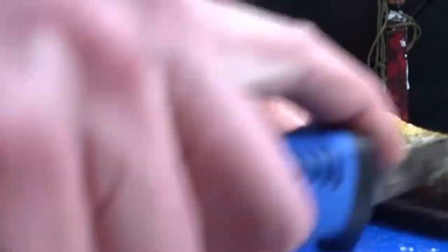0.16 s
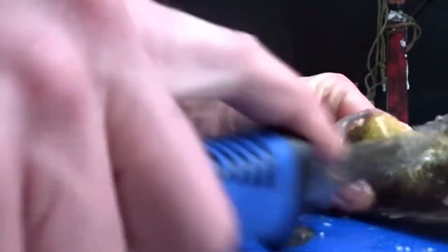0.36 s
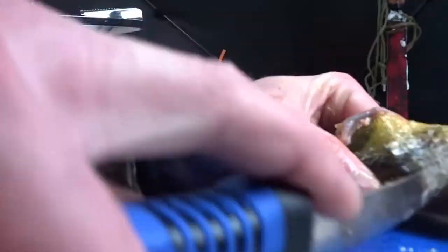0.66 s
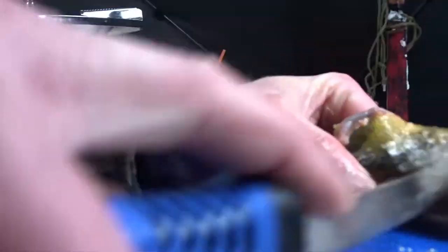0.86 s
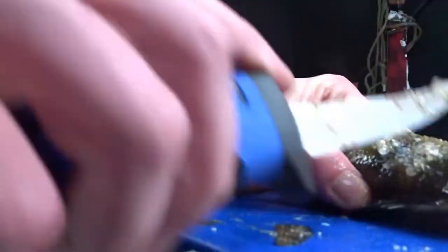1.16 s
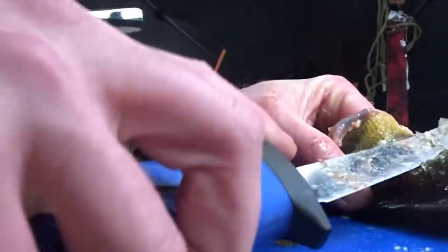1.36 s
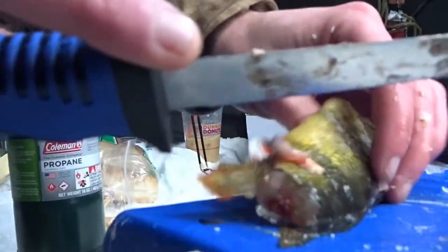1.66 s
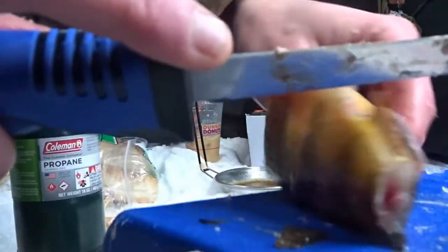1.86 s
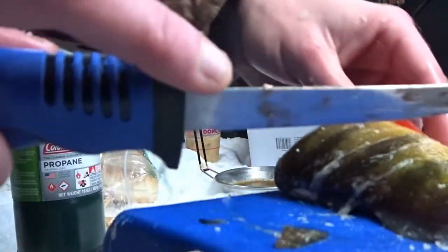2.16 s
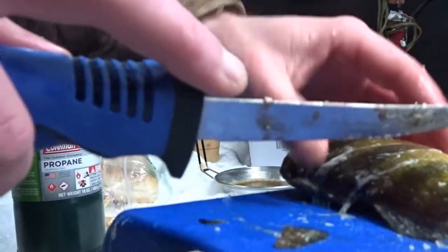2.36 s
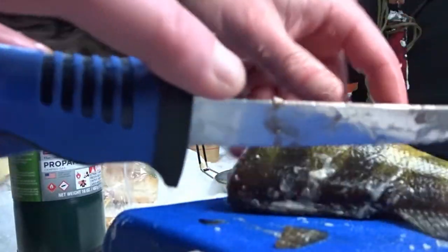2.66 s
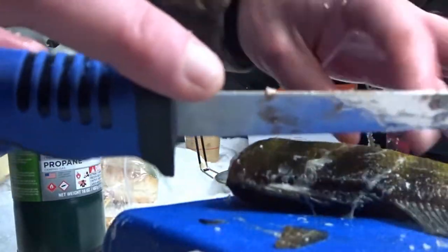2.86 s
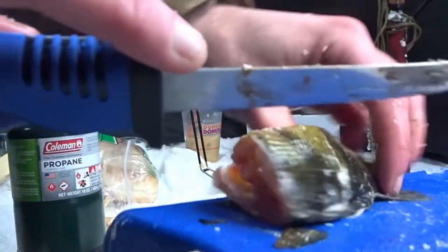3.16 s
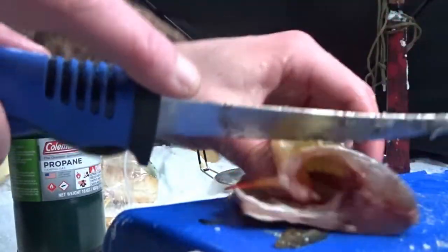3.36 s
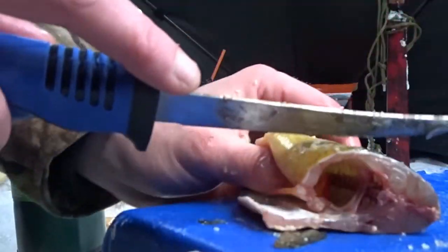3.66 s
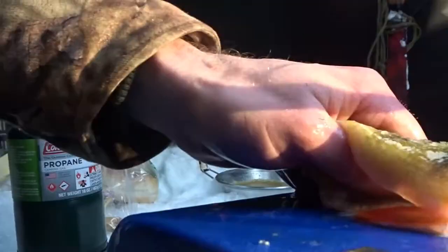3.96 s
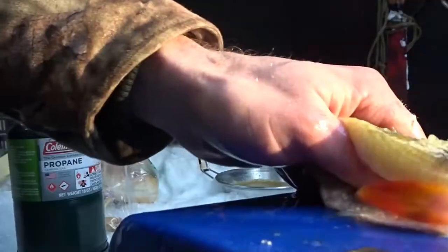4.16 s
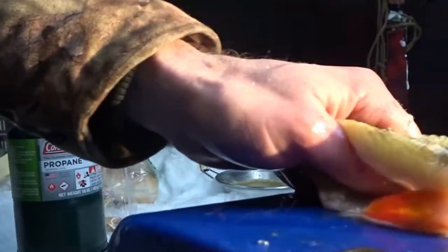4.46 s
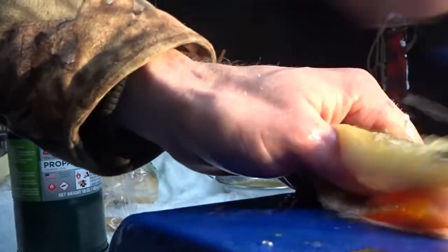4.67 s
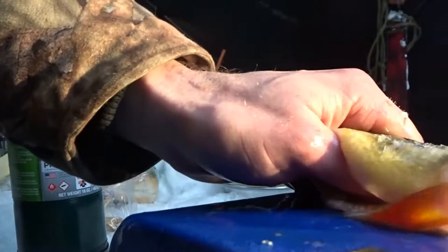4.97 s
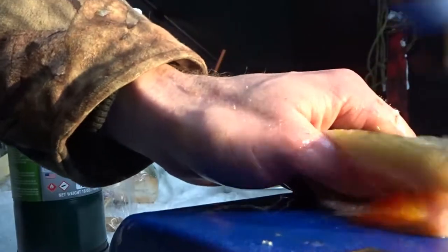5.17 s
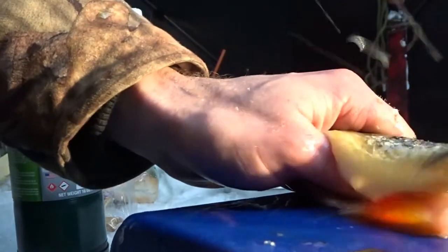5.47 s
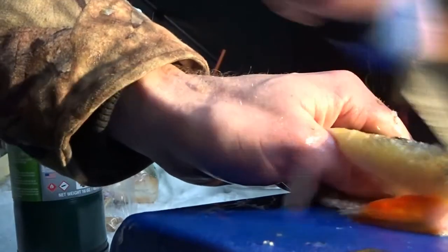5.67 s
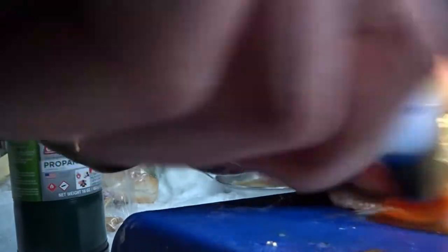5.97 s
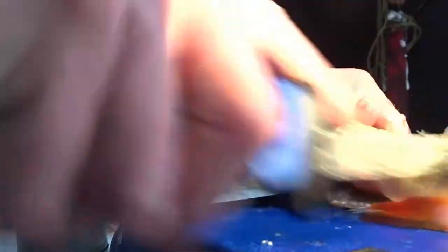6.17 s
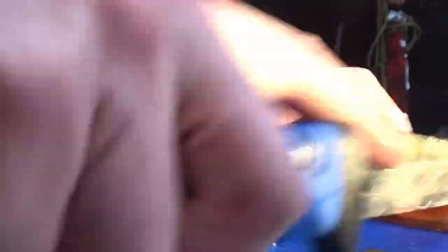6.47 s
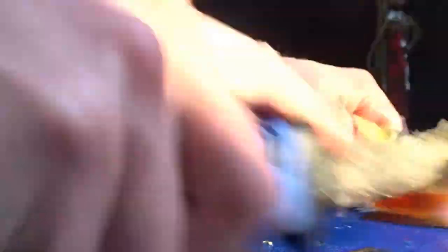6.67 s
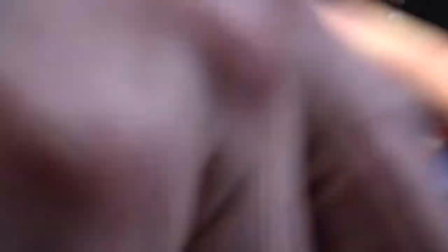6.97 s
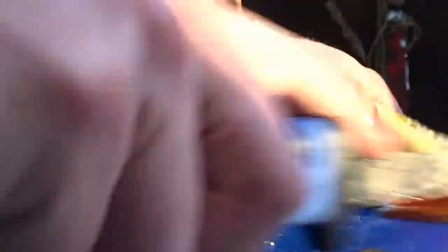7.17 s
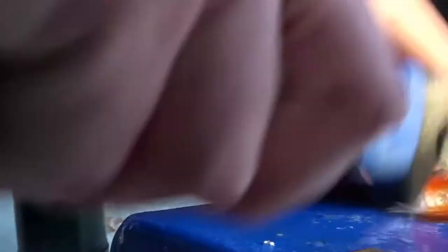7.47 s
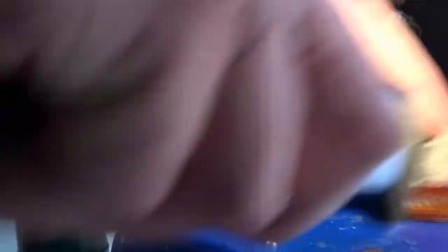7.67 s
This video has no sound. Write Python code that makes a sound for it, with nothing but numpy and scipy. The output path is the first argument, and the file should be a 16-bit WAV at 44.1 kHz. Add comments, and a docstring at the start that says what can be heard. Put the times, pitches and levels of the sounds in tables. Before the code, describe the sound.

Quick dry rasps of a knife blade scraping scales off a fish, a pause of soft wet handling, then steady crackling strokes ending in a metal clink.

```python
"""A knife blade rasps scales off a fish on a plastic board, close by in a canvas shelter: flicked scales are
random damped sines, swelled by each stroke, over skin hiss (shaped noise) and board and table (noise in resonances).
Quick strokes; a pause while the wet fish is turned, slid about and squeaks (two wavering tones); then steady strokes
until the blade clinks on metal (decaying modes over noise). A far engine hums (sines) under quiet air (noise)."""
import sys
import numpy as np
from scipy import signal
from scipy.fft import rfft, irfft, next_fast_len
from scipy.io import wavfile
from scipy.ndimage import map_coordinates

SR = 44100
rng = np.random.default_rng(int(sys.argv[2]) if len(sys.argv) > 2 else 0)


def output_pcm(signal):
    """Save a mono or channel-first signal as 16-bit PCM at the path in sys.argv[1].

    Samples are clipped to [-1, 1] before scaling.
    """
    pcm = np.clip(np.atleast_2d(signal).T, -1, 1) * 32767
    wavfile.write(sys.argv[1], SR, np.round(pcm).astype(np.int16))


N = 344990


def amp(db):
    """Amplitude factor of a level in dB."""
    return 10 ** (np.asarray(db) / 20)


def unit(x):
    """x scaled to rms 1."""
    return x / np.sqrt(np.mean(x ** 2) + 1e-20)


def along(points, hz):
    """(Hz, value) points interpolated on a log frequency axis."""
    f, v = np.transpose(points)
    return np.interp(np.log(hz + 1), np.log(f + 1), v)


def curves(rows):
    """One value per sample for each column after the time."""
    s, *cols = np.transpose(sorted(rows))
    return [np.interp(np.arange(N) / SR, s, c) for c in cols]


def wobble(rate_hz):
    """Smooth random curve with rate_hz knots a second."""
    knots = rng.standard_normal(int(N * rate_hz / SR) + 4)
    return map_coordinates(knots, [np.arange(N) * rate_hz / SR])


def filtered(x, response):
    """x times a complex response of frequency."""
    m = next_fast_len(N + SR // 2)
    return irfft(rfft(x, m) * response(np.fft.rfftfreq(m, 1 / SR)), m)[..., :N]


def noise(spectrum):
    """Two unrelated noises of joint rms 1, shaped by (Hz, dB per Hz) points."""
    return unit(filtered(rng.standard_normal((2, N)), lambda hz: amp(along(spectrum, hz))))


# Air spectrum. Each row: frequency in Hz, relative density in dB per Hz.
AIR_SPECTRUM = [(15, -49), (25, -36), (108, -11), (161, -13.5), (363, -10.5), (451, -4.5), (1260, -2),
                (1610, 0), (3520, 4), (5730, 4), (6740, -3.5), (12900, -10), (16000, -26.5)]
# Engine firing orders. Each row: frequency in Hz, rms level in dB before the swell.
ENGINE_ORDERS = [(161.5, -77.5), (215.3, -80), (269.2, -92)]
# Engine swell. Each row: time in seconds, gain in dB at 150 Hz.
ENGINE_SWELL_CURVE = [(0, -3), (.85, 4), (.95, 2.5), (1.41, 3.5), (1.45, -4), (2.6, 0.5), (2.9, -8),
                      (3.6, -7), (4, -14), (7.82, -19)]


def air():
    """Soft room air, and low orders of a far engine, slightly unsteady; higher orders swell and fade more."""
    t = np.arange(N) / SR
    swell_db, = curves(ENGINE_SWELL_CURVE)
    hum = np.zeros(N)
    for hz, db in ENGINE_ORDERS:
        level_db = db + swell_db * (hz / 150) ** 2 + 1.2 * wobble(2.8)
        turns = hz * t + 0.023 * wobble(6.3)
        hum += np.sqrt(2) * amp(level_db) * np.sin(2 * np.pi * turns)
    hiss = amp(-57.5 + 0.44 * wobble(6.1)) * noise(AIR_SPECTRUM)
    return hiss + hum * [[1], [0]]  # hum in the common signal only


# Board resonances. Each row: frequency in Hz, width in Hz, gain in dB.
BOARD_MODES = [(337, 34.4, -4), (475.3, 55.4, 3), (604, 235, -2.5), (876, 127, 1), (1020, 65, 2.5),
               (1337, 150, 0), (1686, 125, -3), (2160, 270, -4), (3840, 660, -8)]


def board(x):
    """Plastic board resonances in parallel; too small a plate to radiate deep bass."""
    def response(f):
        total = 0
        for k, (hz, width_hz, db) in enumerate(BOARD_MODES):
            mode = 1j * f * width_hz / (hz * hz - f * f + 1j * f * width_hz)
            total = total + (-1) ** k * amp(db) * mode  # alternating sign
        return 1j * f / (220 + 1j * f) * total
    return filtered(x, response)


def plucks(start, hz, cycles, size):
    """Damped sines with soft onset, in two unrelated phases; things this small radiate no bass."""
    t = np.arange(400) / SR
    turns = hz[:, None] * t
    decay = np.exp(-turns / cycles[:, None])
    shape = size[:, None] * decay * (1 - np.exp(-turns / 0.088))
    phase = rng.random((len(hz), 2)).T[..., None]
    waves = shape * np.sin(2 * np.pi * (turns + phase))
    where = (start[:, None] + np.arange(len(t))).ravel()
    both = np.array([np.bincount(where, w.ravel(), N + len(t))[:N] for w in waves])
    return filtered(both, lambda f: (1j * f / (600 + 1j * f)) ** 2)


def rasp(ring_hz, cycles, rate_hz, spread, spiky_db):
    """Scales flick past the edge: most ring near the given pitch, the rest tick more briefly and scatter wider."""
    draw = rng.random((int(rate_hz * N / SR), 3))
    start = (draw[:, 0] * N).astype(int)
    rings = draw[:, 1] < .68
    life = np.where(rings, cycles[start], 1.6)  # 1/e decay in cycles
    # damped scales agree less in pitch
    hz = ring_hz[start] * np.exp(spread / life * rng.standard_normal(len(draw)))
    size = amp(-spiky_db * np.log(1.03 - draw[:, 2])) / np.sqrt(life)  # many small, a few large
    return unit(plucks(start, hz, life, size))


def catches(rate_hz, release_s):
    """Stick and slip: contact catches at random and at every single tick, then lets go; zero mean, rms 1."""
    kicks = (rng.random(N) < rate_hz / SR) * rng.exponential(size=N)
    tick_s = np.transpose(SINGLE_TICKS)[0]
    kicks[np.round(tick_s * SR).astype(int)] = 1
    release = np.exp(-np.arange(SR // 10) / SR / release_s)
    shake = np.log(0.17 + signal.fftconvolve(kicks, release)[:N])
    return unit(shake - shake.mean())


SAG_DB_PER_S = 48.5  # pressure eases while held


def press(start_s, rise_s, held_s, under_db, fall_db_per_s, db, curve):
    """Power of one contact a millisecond: it lands, swells, holds, fades; and the seconds since it let go."""
    t = np.arange(0, N / SR, 1 / 1000) - start_s
    late_s = np.maximum(t - rise_s - held_s, 0)
    swell_db = -under_db * np.clip(1 - t / rise_s, 0, 1) ** curve
    sag_db = -SAG_DB_PER_S * np.clip(t - rise_s, 0, held_s)
    shape_db = swell_db + sag_db - fall_db_per_s * late_s
    return (t >= 0) * amp(2 * (db + shape_db)), late_s


# Blade strokes. Each row: landing time in seconds, dig-in in seconds, hold in seconds, landing level in dB under full,
# rasp level in dB, scale ring in Hz, then bite, hiss and board in dB over the rasp.
BLADE_STROKES = [(.052, 0.11, 0.0093, 7.6, -25.5, 2844, -17, -5.5, -13),
                 (0.278, .05, 0.054, 13, -25.5, 2930, -10, -3.5, -9),
                 (0.551, 0.0072, 0.034, 8.3, -30.5, 2780, -1, -5.5, -11),
                 (0.664, 0.0057, 0.0097, 6, -28.5, 2320, -5, -4, -18),
                 (.788, 0.034, 0.03, 11.3, -25.5, 2460, -6, -2.5, -10.5),
                 (4.008, 0.041, 0.036, 2.3, -26.5, 2050, -0.5, -2, -9),
                 (4.282, 0.041, 0.069, 16, -25.5, 2090, 3.5, -1, -11),
                 (4.583, 0.027, 0.047, 13, -23.5, 2050, -1.5, -3, -12),
                 (4.866, 0.022, 0.043, 14, -28, 1880, 3.5, -1.5, -5.5),
                 (5.125, 0.026, 0.022, 12.3, -23.5, 2070, 0, -7, -12),
                 (5.359, 0.034, 0.046, 21, -23, 1980, 1, -8, -13),
                 (5.642, 0.027, 0.023, 19.4, -22.5, 2220, 4, -5, -9),
                 (5.892, 0.028, 0.066, 16.5, -23, 2315, -0.5, -6.5, -11.5),
                 (6.15, 0.018, 0.042, 11, -24, 2120, 0.5, -5, -21),
                 (6.39, 0.013, .008, 6.2, -35.5, 2330, -1, -4, -40),
                 (6.436, 0.0033, 0.049, 2.7, -32, 1990, 7, 0, -19),
                 (6.624, 0.036, 0.057, 15, -23, 2290, -4, -6, -25),
                 (6.879, 0.026, 0.033, 16, -23.5, 2235, 1.5, -10, -4.5),
                 (7.11, 0.028, 0.059, 10.8, -22.5, 2203, 0.5, -6, -25),
                 (7.367, 0.033, .04, 16.5, -23, 2304, 1.5, -6, -10.5),
                 (7.576, 0.042, 0.055, 23, -24, 2310, 0.5, -7, -15.5),
                 (7.759, 0.0054, 0.014, 2.6, -33, 2180, 8.5, -6, -25)]
LIFT_DB_PER_S, HISS_LINGERS_S, RING_CLIMBS_HZ_PER_S = 426, .012, 4700
DIG_CURVE = 0.44  # under 1: edge skims first, digs in suddenly
# Blade brushing the fish on its way back. Each row: start in seconds, rasp level in dB, scale ring in Hz,
# hiss and board in dB over the rasp.
RETURN_BRUSHES = [(0.199, -39, 2580, -17, -2), (.515, -53, 2730, 7, -21), (.625, -45.5, 2500, -18, 8),
                  (.71, -46, 2300, -15, 4), (.935, -59, 1980, -21, -9), (0.746, -47, 2900, -2, -8),
                  (3.975, -42.5, 2180, -4, -13), (4.144, -38.5, 2560, -6, -6.5),
                  (4.191, -41.5, 2620, -11, -14), (4.475, -46.5, 2480, -17, -15),
                  (4.543, -42, 2260, -4, -7), (4.737, -42.5, 2340, -8, -10), (4.805, -51, 3500, -2, -8),
                  (4.829, -41, 2200, -7.5, -7), (5.234, -50, 2600, -25, 2), (5.262, -52.5, 2360, 5.5, -22),
                  (5.333, -48.5, 2220, 2, 2.5), (5.51, -51, 2800, -1, -2.5), (5.59, -39.5, 1990, -12, -36),
                  (5.823, -47, 2300, -1, -21), (6.064, -37.5, 2500, -12.5, -26),
                  (6.337, -42.5, 2270, -12, -21), (6.846, -57, 2190, 1, -17), (7.04, -62.5, 2300, -3, 8),
                  (7.334, -48, 2200, -13, -17)]
BRUSH_HELD_S, BRUSH_FADES_DB_PER_S, BRUSH_BITE_DB = 0.011, 439, 0
# Fish shoved by hand, and one thump as it slips on the board (last row). Each row: start in seconds,
# swell in seconds, hold in seconds, fade in dB/s, rasp level in dB, scale ring in Hz,
# hiss and board in dB over the rasp.
SHOVES_AND_SLIP = [(1.32, 0.018, .005, 497, -55, 2370, 2, -23),
                   (1.419, .006, 0.085, 149, -44.5, 2800, -9, -3.5),
                   (1.565, 0.013, 0.075, 111, -46.5, 2540, -6.5, -8),
                   (1.7, 0.022, 0.024, 200, -63.5, 2900, -8, 9),
                   (1.78, 0.011, .01, 199, -64.5, 2750, -9, 16),
                   (1.913, 0.029, 0.076, 494, -42, 2650, -33, 9.5),
                   (2.089, 0.026, 0.0044, 900, -39.5, 1780, -54, 6),
                   (2.17, 0.016, 0.016, 150, -64, 2300, -14, -8),
                   (2.262, .004, .006, 500, -63, 2200, -20, 10),
                   (2.29, 0.0071, 0.079, 300, -56, 2200, -29, 14),
                   (2.361, 0.0062, 0.031, 405, -44, 2320, -40, 11),
                   (2.422, 0.058, 0.026, 484, -31, 2400, -27, 9.5),
                   (2.898, .006, 0.028, 88, -39, 2970, -7.5, -11),
                   (3.084, 0.024, 0.087, 200, -44, 2620, -12, 4.5),
                   (3.168, .028, 0.0046, 304, -34.5, 2400, -20, -2.5),
                   (3.26, .03, 0.039, 200, -53, 2470, -6.5, -1),
                   (3.372, .006, 0.0076, 300, -55.5, 2250, -18, 3.5),
                   (3.462, .012, .006, 300, -45.5, 2200, -13.5, -1.5),
                   (3.53, 0.015, 0.26, 200, -53, 2030, -37, -8),
                   (3.78, 0.057, 0.0034, 500, -43, 1910, -13, -10),
                   (6.929, 0.0057, 0.015, 506, -29, 1500, -22, 9.5)]
SWELL_FROM_DB, SHOVE_BITE_DB = 15.5, 2
# Faint continuous rustle under the strokes and the handling. Each row: time in seconds, rasp level in dB,
# scale ring in Hz, board in dB over the rasp.
FAINT_RUSTLE = [(0, -85, 2200, -6), (.045, -80, 2200, -6), (.06, -64, 2580, -9), (.5, -51.5, 2460, -2.5),
                (.9, -47, 1800, -2), (1.17, -56.5, 1720, -7), (1.4, -65, 1900, -2), (1.8, -68, 2700, 4),
                (2.6, -70, 2500, 8), (2.88, -97, 2200, -12), (2.95, -54.5, 2600, 1.5),
                (3.5, -63.5, 2210, 2), (3.9, -53.5, 2050, -11), (4.5, -54.5, 2280, -7), (6, -53, 2300, -9),
                (7.82, -62, 2300, -3)]
RUSTLE_BITE_DB, RUSTLE_HISS_DB = -2, -13
LONG_CYCLES, DAMPED_CYCLES = 5.06, 2.4  # rings long under the blade and in the faint rustle, damped in shoves and slip
BOARD_JOINS_DB, BITE_QUITS_DB_PER_S = 1.5, 45  # board loads only as the edge digs in; bite goes first


def contact():
    """Contact powers add: rasp dB; bite, hiss, board in dB over it; ring Hz and cycles; one value per sample."""
    rows = [(s, rise, held, under, LIFT_DB_PER_S, db, hz, bite, hiss, low, LONG_CYCLES, HISS_LINGERS_S, DIG_CURVE)
            for s, rise, held, under, db, hz, bite, hiss, low in BLADE_STROKES]
    rows += [(s, .003, BRUSH_HELD_S, 6, BRUSH_FADES_DB_PER_S, db, hz, BRUSH_BITE_DB, hiss, low, LONG_CYCLES, 0, 1)
             for s, db, hz, hiss, low in RETURN_BRUSHES]
    rows += [(s, rise, held, SWELL_FROM_DB, fall, db, hz, SHOVE_BITE_DB, hiss, low, DAMPED_CYCLES, 0, 1)
             for s, rise, held, fall, db, hz, hiss, low in SHOVES_AND_SLIP]
    grid_s = np.arange(0, N / SR, 1 / 1000)
    knots, *columns = np.transpose(FAINT_RUSTLE)
    db, hz, low = (np.interp(grid_s, knots, c) for c in columns)
    rustle = amp(2 * db)
    total = np.array([rustle, rustle * amp(2 * RUSTLE_BITE_DB), rustle * amp(2 * RUSTLE_HISS_DB),
                      rustle * amp(2 * low), rustle * hz, rustle * LONG_CYCLES])
    for s, rise, held, under, fall, db, hz, bite, hiss, low, cycles, linger, curve in rows:
        power, late_s = press(s, rise, held, under, fall, db, curve)
        slide, _ = press(s, rise + linger, held, under, fall, db + hiss, curve)
        load, _ = press(s, rise + linger, held, under + BOARD_JOINS_DB, fall, db + low, curve)
        bite_power = power * amp(2 * (bite - BITE_QUITS_DB_PER_S * late_s))
        pitch_hz = hz + RING_CLIMBS_HZ_PER_S * np.minimum(late_s, .15)  # climbs once the contact lets go
        total += [power, bite_power, slide, load, power * pitch_hz, power * cycles]
    shares = total[1:] / total[0]
    controls = [10 * np.log10(total[0]), *10 * np.log10(shares[:3]), *shares[3:]]
    return [np.interp(np.arange(N) / SR, grid_s, c) for c in controls]


# Bite decay. Each row: time in seconds, 1/e life in cycles.
BITE_CYCLES = [(0, 2.5), (3.85, 1.47), (4.25, 11), (5.75, 7), (6.3, 1.66), (7.82, 4.4)]
# Wet skin under the edge. Each row: frequency in Hz, relative density in dB per Hz.
SKIN_HISS = [(1760, -36.5), (3000, -4), (3680, -10.5), (4050, -29), (4410, -7), (6390, -5.5),
             (15100, -17.5), (16000, -18)]
# Table shaken by the stroke. Each row: frequency in Hz, relative density in dB per Hz.
TABLE_THUD = [(15, -62), (25, -9), (60, -9.5), (120, 3), (190, 14.5), (260, 12), (380, -1), (700, -58)]


def knife():
    """Pressure drives rasp, 4 kHz bite, skin hiss, board and table; one stick-slip judder moves all but the table."""
    rasp_db, bite_db, hiss_db, board_db, ring_hz, ring_cycles = contact()
    bite_cycles, = curves(BITE_CYCLES)
    judder = catches(60, release_s=0.0072) * ring_cycles / LONG_CYCLES  # damped contacts judder less
    scales = amp(-5.0 + 3.62 * judder) * rasp(ring_hz, ring_cycles, 1300, spread=0.45, spiky_db=1.5)
    bite_rasp = rasp(np.full(N, 4050), bite_cycles, 1400, spread=0.36, spiky_db=2.0)
    bite = amp(bite_db - 6.0 + 4.54 * judder) * bite_rasp
    hiss = amp(hiss_db + 2.5 + 1.94 * judder + 3.46 * wobble(260)) * noise(SKIN_HISS)
    load = amp(rasp_db + board_db + 0.33 * judder + 3.33 * wobble(150))
    plastic = board(load * rng.standard_normal((2, N)))
    plastic /= np.sqrt(np.mean(board(rng.standard_normal(N)) ** 2))  # unit board gain for white noise
    table = amp(0.49 * board_db - 31 + 3 * wobble(21)) * noise(TABLE_THUD)
    return amp(rasp_db) * (scales + bite + hiss + table) + amp(-5.5) * plastic


# Single ticks: scales snapping under the blade, and knocks as the fish is handled. Each row: time in seconds,
# relative level in dB, ring in Hz, treble crack in dB over that level before the common crack gain.
SINGLE_TICKS = [(0.0536, -35, 2170, -6), (0.0873, -12.5, 3070, -13), (0.122, -21, 5600, -3),
                (0.1302, -24, 5050, -6), (0.1575, -14.5, 2870, 6), (0.1686, -21, 5070, 12),
                (0.2795, -37, 1810, -10), (0.3041, -25, 3160, 9), (0.329, -12.5, 3080, 9),
                (0.3673, -14.5, 3120, -10), (0.3743, -13.5, 2200, -3), (0.5607, -30, 2310, 5),
                (0.6004, -28, 3420, -8), (0.668, -27, 3000, -8), (0.6755, -22, 2050, 8),
                (0.6831, -22, 2200, 10), (0.7928, -23, 3040, -9), (0.8392, -20.5, 2820, 16),
                (0.8443, -16, 2140, 4), (0.8576, -20, 2170, 0), (0.9366, -35, 3110, -20),
                (1.9436, -43.5, 1370, -31), (2.0103, -31.5, 3080, -27), (2.3691, -29.5, 2330, -30),
                (2.3863, -32, 3310, -29), (2.455, -26, 1380, -34), (2.4674, -23, 1560, -19),
                (2.4804, -19.5, 1360, -27), (2.5012, -16.5, 2920, -14), (2.508, -29, 1420, -22),
                (2.853, -44.5, 1840, -25), (2.9056, -23, 3330, -10), (2.9747, -35, 2640, -6),
                (3.3798, -40, 2170, -21), (3.5454, -38, 1930, -25), (3.7806, -38, 1820, -22),
                (3.8328, -31.5, 1860, -17), (3.9781, -29, 2250, -12), (4.0119, -13.5, 5130, -8),
                (4.0344, -30, 1870, -2), (4.0461, -13.5, 2060, -12), (4.0672, -20, 4050, -4),
                (4.1455, -19, 3950, -6), (4.2113, -29.5, 2880, -12), (4.287, -25.5, 1730, -23),
                (4.299, -21, 5090, -6), (4.3085, -13.5, 4000, 2), (4.3304, -9, 3980, -18),
                (4.3384, -14.5, 2130, -15), (4.3731, -13, 4020, -13), (4.3822, -14.5, 1870, -6),
                (4.4887, -36, 2140, -15), (4.5467, -32.5, 3800, 4), (4.6144, -13, 3880, -5),
                (4.6215, -8, 1970, -16), (4.6369, -15, 1960, -12), (4.6441, -19, 1890, -17),
                (4.6522, -15.5, 1830, -10), (4.74, -33, 2230, -14), (4.8314, -38, 3000, -15),
                (4.8472, -35, 1800, -17), (4.8939, -17.5, 2230, -12), (4.9074, -15, 1910, -13),
                (4.9258, -15, 1770, -11), (4.937, -21, 5660, 10.5), (5.1334, -9.5, 4050, -23),
                (5.1463, -17, 4000, -17), (5.162, -8, 4000, -20), (5.1717, -18.5, 1780, -7),
                (5.2657, -27, 4270, -1), (5.3647, -27, 1740, -23), (5.3884, -11.5, 4100, -9),
                (5.408, -11, 1960, -17), (5.4247, -25, 1930, -11), (5.4325, -19, 4050, -4),
                (5.4419, -22, 1760, -14), (5.5336, -33.5, 2500, -7), (5.592, -34, 1960, -20),
                (5.5993, -34, 1800, -15), (5.6454, -28, 2270, -21), (5.6544, -18, 1910, -22),
                (5.6632, -19, 1850, -11), (5.6726, -9, 4040, -4), (5.6895, -18, 3950, -13),
                (5.834, -35, 2350, 11.5), (5.9182, -12.5, 2190, -30), (5.9312, -13.5, 2110, -13),
                (5.9397, -16, 4100, -18), (5.9515, -12, 4000, -8), (5.9643, -19, 4010, -9),
                (5.9784, -17, 2410, -14), (6.1616, -11.5, 2140, -20), (6.175, -9.5, 2220, -17),
                (6.1839, -22, 4090, -9), (6.207, -22, 3900, -16), (6.3403, -28.5, 2170, -17),
                (6.398, -25, 2000, -17), (6.4062, -22, 5300, -15), (6.4461, -14, 2070, -12),
                (6.4582, -14.5, 2180, -15), (6.481, -17, 3860, -8), (6.6324, -28, 1950, -9),
                (6.6768, -11.5, 2150, -16), (6.6828, -22, 2280, -12), (6.6953, -11.5, 5460, -11),
                (6.7037, -22, 2360, -7), (6.8495, -46, 2100, -8), (6.8813, -26, 5400, 6),
                (6.8931, -15, 2370, -17), (6.9113, -11, 2170, -7), (6.923, -16.5, 4500, -14),
                (6.9437, -21, 2270, -18), (6.9544, -20, 1520, -18), (7.1213, -13.5, 5440, -3),
                (7.1348, -14.5, 2350, -15), (7.16, -11, 2180, -15), (7.171, -16, 2900, -13),
                (7.1956, -27, 3070, -9), (7.3443, -39, 2920, 1), (7.351, -29.5, 5280, -19),
                (7.373, -37, 2280, -19), (7.3889, -14, 2360, -13), (7.4045, -15.5, 2500, -20),
                (7.4451, -19, 1960, -10), (7.458, -26, 3040, -4), (7.5766, -27, 2190, -22),
                (7.5872, -9.5, 5670, -27), (7.6114, -23, 2270, 5), (7.6208, -18, 2320, -16),
                (7.6399, -8.5, 2330, -16), (7.6516, -11, 2280, -21), (7.6588, -18, 2100, -13),
                (7.6746, -25, 2500, -8), (7.6998, -23, 4220, -5)]
TICK_CYCLES, TICK_DB = 4.65, 3
KNOCK_DB = -4  # over the board's share of the moment


def ticks():
    """Each tick rings a few cycles, cracks in the treble and knocks the board."""
    s, db, hz, crack_db = np.transpose(SINGLE_TICKS)
    start = np.round(s * SR).astype(int)
    knock_db = KNOCK_DB + contact()[3][start + 200]
    ring = plucks(start, hz, np.full(len(s), TICK_CYCLES), amp(db + TICK_DB))
    crack, knock = np.zeros((2, 2, N + 300))
    t = np.arange(300) / SR
    burst = amp(-60 * t / 0.0024) * (1 - np.exp(-t / 0.00011))
    for at, crack_gain, knock_gain in zip(start, amp(db + crack_db), amp(db + knock_db)):
        crack[:, at:at + len(t)] += crack_gain * burst * rng.standard_normal((2, len(t)))
        knock[:, at] = knock_gain
    crack = filtered(crack[:, :N], lambda f: (1j * f / (3500 + 1j * f)) ** 2 * (11000 / (11000 + 1j * f)) ** 2)
    return ring + amp(11.0) * crack + amp(25.5) * board(knock[:, :N])


# Wet skin under the fingers. Each row: time in seconds, lower tone in Hz, upper tone in Hz, level in dB.
SKIN_SQUEAK = [(3.46, 1910, 3500, -96), (3.54, 1900, 3560, -57.5), (3.64, 1830, 3500, -59),
               (3.73, 1800, 3860, -57.5), (3.8, 1840, 4240, -60.5), (3.9, 1800, 4340, -90)]


def squeak():
    """Two thin, broken, scratchy tones: sines of jittered phase and level."""
    low_hz, high_hz, db = curves(SKIN_SQUEAK)

    def tone(hz):
        turns = np.cumsum(hz) / SR + 0.5 * wobble(140)
        return amp(5.5 * wobble(70)) * np.sin(2 * np.pi * turns)

    level = amp(np.where(db > -85, db, -140))
    return level * (tone(low_hz) + amp(2.5) * tone(high_hz)) * [[1], [.4]]


# Blade touching metal. Each row: time in seconds, relative level in dB.
METAL_HITS = [(7.7595, -9.5)]
# Thin metal modes. Each row: frequency in Hz, relative level in dB, t60 in seconds.
METAL_MODES = [(755, -28, 4.4), (1474, -13.5, 0.33), (1870, -1.5, 0.078), (2450, -12, 0.33),
               (2600, -20, 0.1), (2988, -11.5, 0.34), (3165, -9, 0.49), (3680, -21, 0.14),
               (4140, -5.5, 0.17), (4640, -29, 3.9), (4760, -18, 0.65), (5330, -2, 0.18),
               (6400, -19, 0.093), (6481, -23, 0.29), (7100, -15, 0.11), (7257, -4, 0.064),
               (7590, -30, 1.8), (8040, -5, 0.14), (8400, -14, 0.088), (8900, 3, 0.065),
               (10560, 1.5, 0.063), (11400, -21, 0.31), (12500, -29, 0.19), (12930, -17, 0.18)]


def clink():
    """Blade touches thin metal: a cluster of wavering modes over a dense jangle."""
    out = np.zeros((2, N))
    jangle = noise([(500, -42), (1400, -7), (2500, -25), (6000, 7), (10000, 4), (16000, 1.5)])
    for s, db in METAL_HITS:
        t = np.arange(N - round(s * SR)) / SR
        ring = np.zeros((2, len(t)))
        for hz, level_db, t60_s in METAL_MODES:
            turns = hz * t + rng.random((2, 1)) + 0.064 * wobble(60)[:len(t)]
            ring += amp(level_db - 60 * t / t60_s) * np.sin(2 * np.pi * turns)
        dense = amp(6.5 - 60 * t / 0.11) * jangle[:, :len(t)]
        onset = 1 - np.exp(-t / 0.00069)
        out[:, -len(t):] += amp(db - 15.5) * (ring + dense) * onset
    return out


# Shelter decay. Each row: frequency in Hz, t60 in seconds.
SHELTER_DECAY = [(300, 0.019), (2000, 0.082), (10000, 0.15)]


def shelter(x):
    """Near walls answer briefly: a noise tail in which each frequency dies at its own speed."""
    hz, t, z = signal.stft(rng.standard_normal((2, SR // 5)), SR, nperseg=128)
    decay = amp(-60 * t / along(SHELTER_DECAY, hz)[:, None])
    tail = signal.istft(z * decay, SR, nperseg=128)[1]
    x = filtered(x, lambda f: (1j * f / (1100 + 1j * f)) ** 2)  # canvas lets the bass through
    return signal.fftconvolve(x, tail / np.linalg.norm(tail[0]), axes=1)[:, :N]


# Stereo likeness. Each row: frequency in Hz, left-right correlation (1 = same).
EAR_LIKENESS = [(30, 0.65), (70, 0.9), (130, 0.98), (300, .99), (600, 0.98), (1200, 0.84), (2400, 0.8),
                (5000, 0.25), (9000, 0.12), (14000, .01)]


def scene():
    """Two close microphone ports hear nearly the same bass and ever less alike treble; left slightly louder."""
    near = knife() + ticks() + clink() + squeak()
    both = near + amp(-8) * shelter(near) + air()

    def split(hz):
        angle = np.arccos(np.clip(along(EAR_LIKENESS, hz), -1, 1)) / 2
        return np.array([np.cos(angle), np.sin(angle)])

    mid, side = filtered(both, split)
    return np.array([mid + side, mid - side]) * amp([[.45], [-.45]])


HEADROOM, TOP_HZ = 0.82, 15750


def record(dry):
    """Soft saturation rounds off the sharpest peaks; nothing passes above the band limit."""
    rounded = dry / (1 + np.abs(dry / HEADROOM) ** 4) ** (1 / 4)
    return filtered(rounded, lambda hz: hz < TOP_HZ)


dry = scene()
out = record(dry)
output_pcm(out)
```